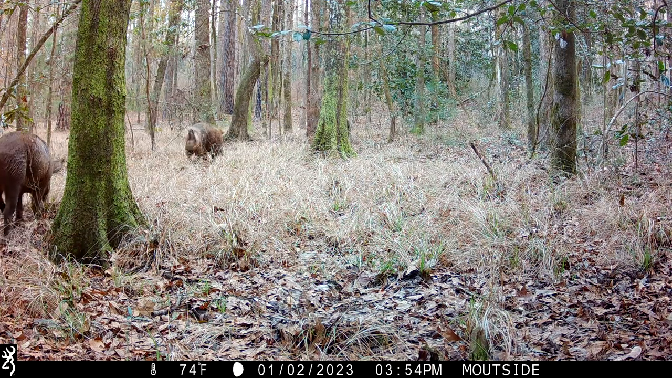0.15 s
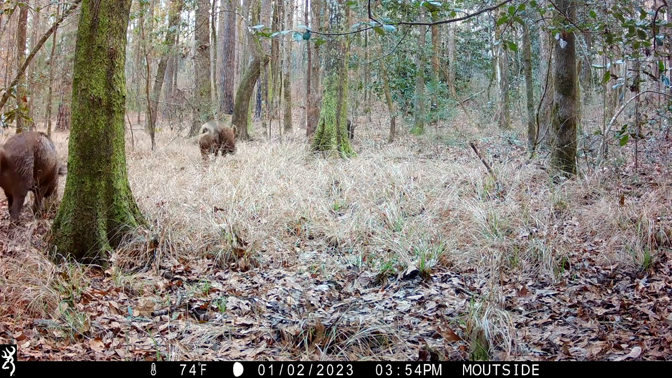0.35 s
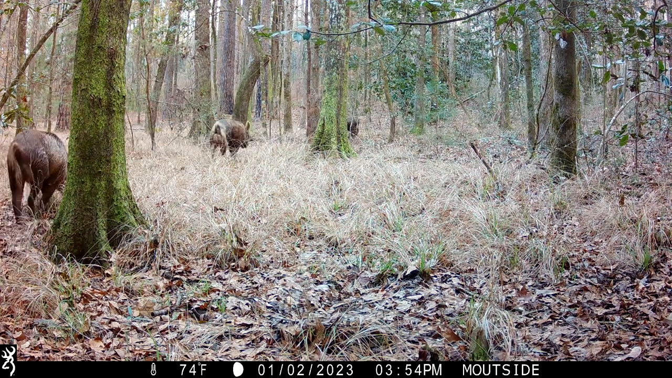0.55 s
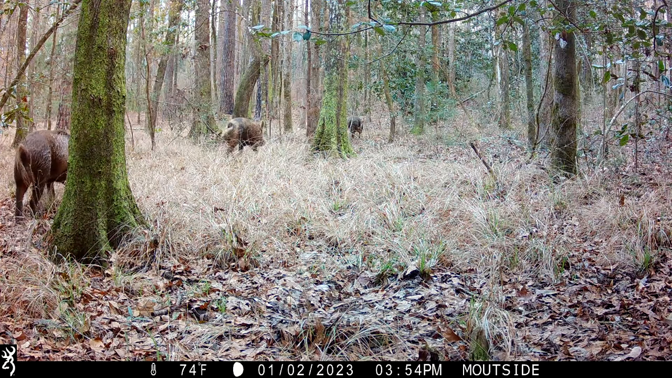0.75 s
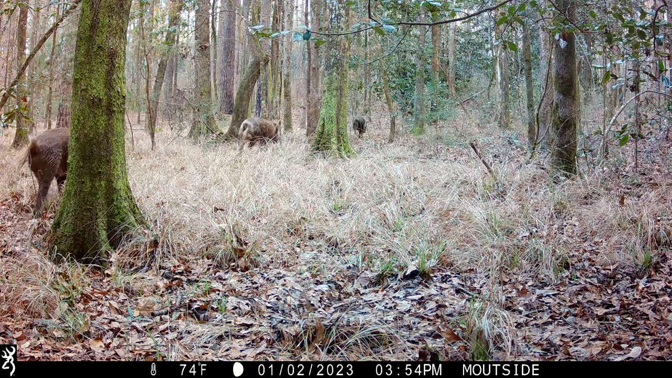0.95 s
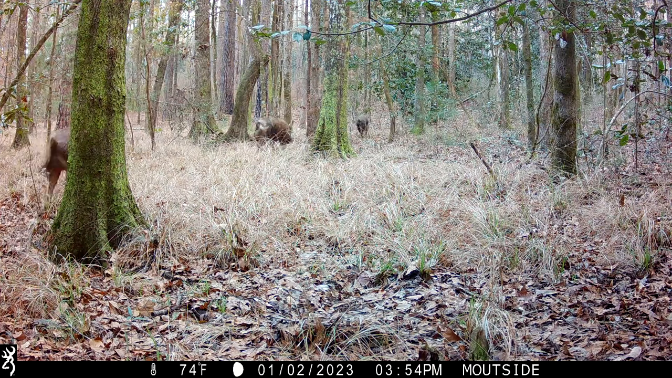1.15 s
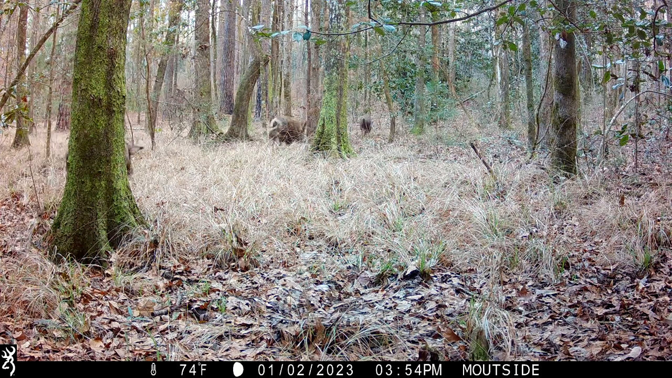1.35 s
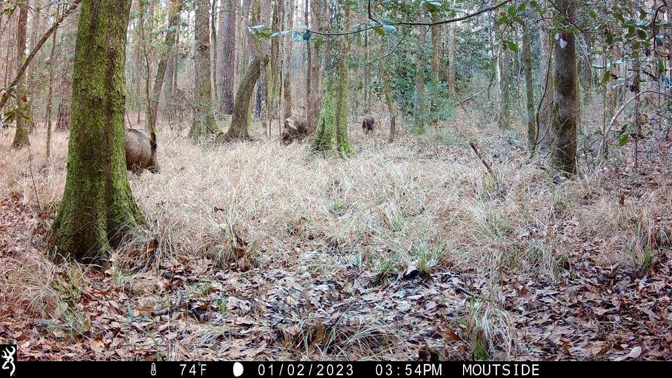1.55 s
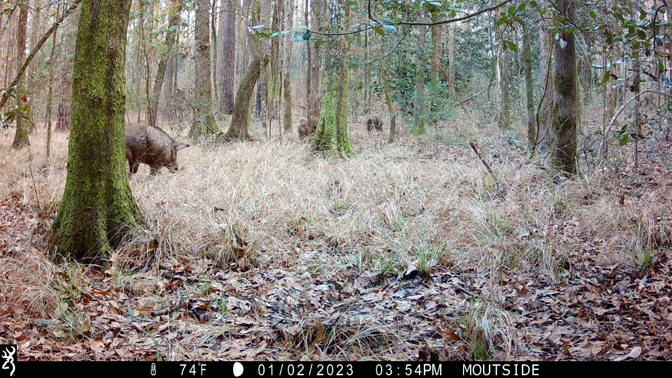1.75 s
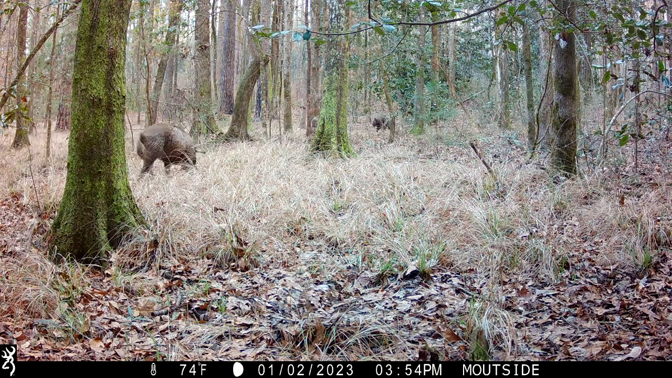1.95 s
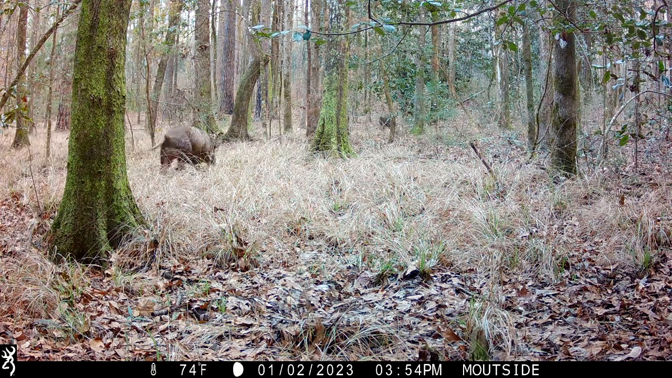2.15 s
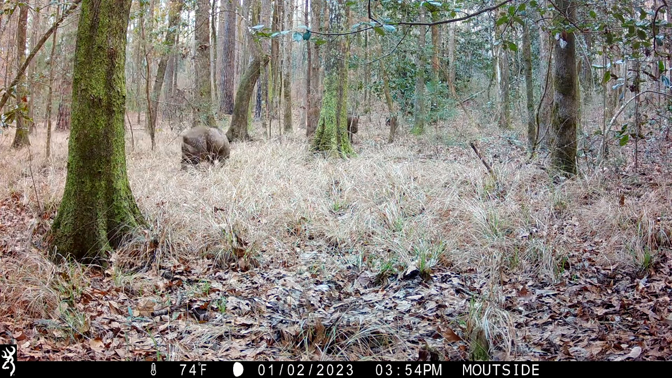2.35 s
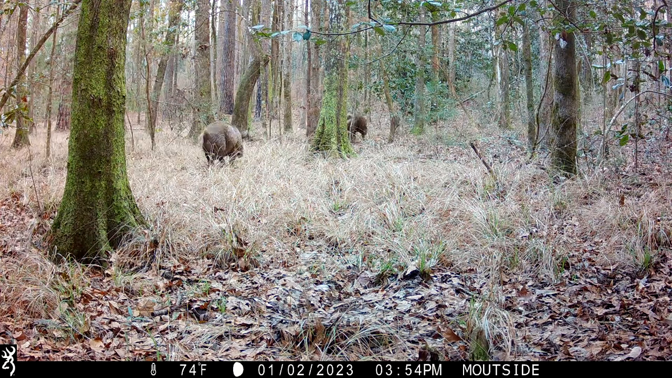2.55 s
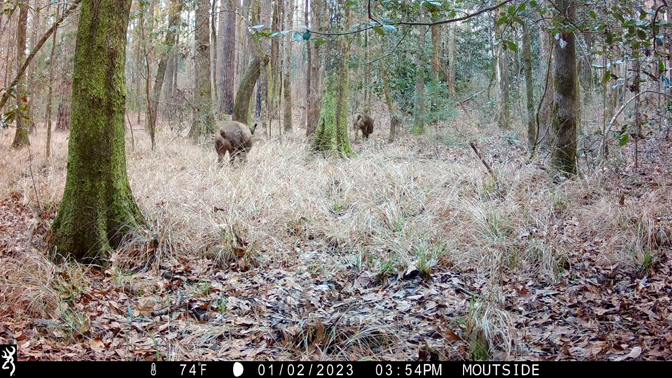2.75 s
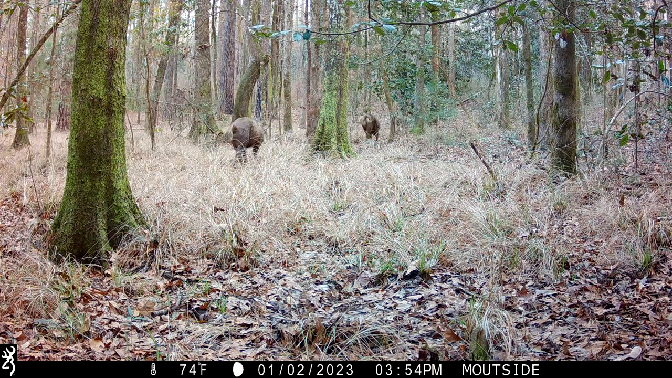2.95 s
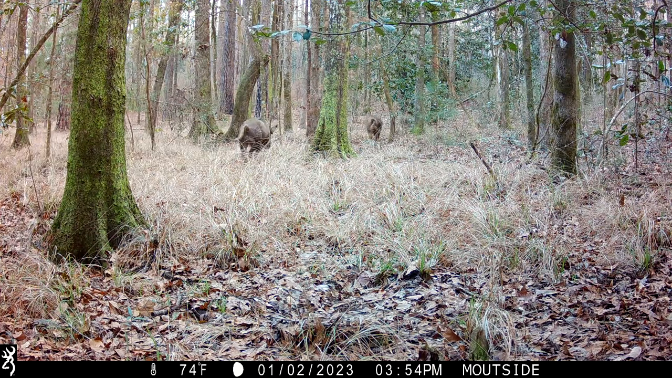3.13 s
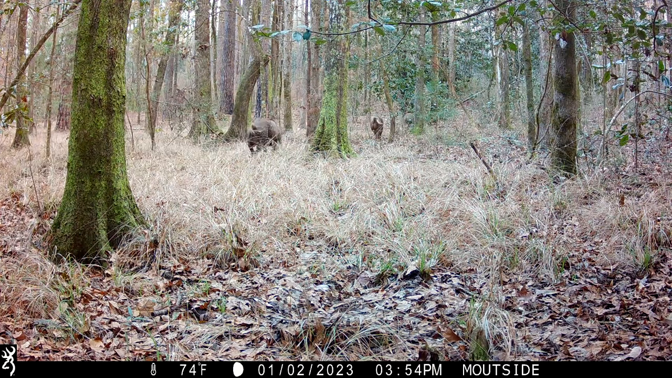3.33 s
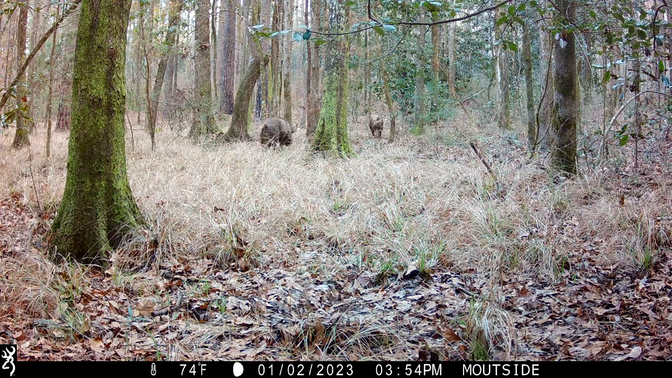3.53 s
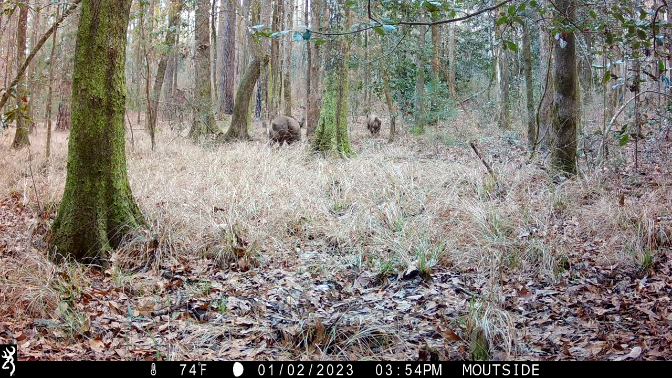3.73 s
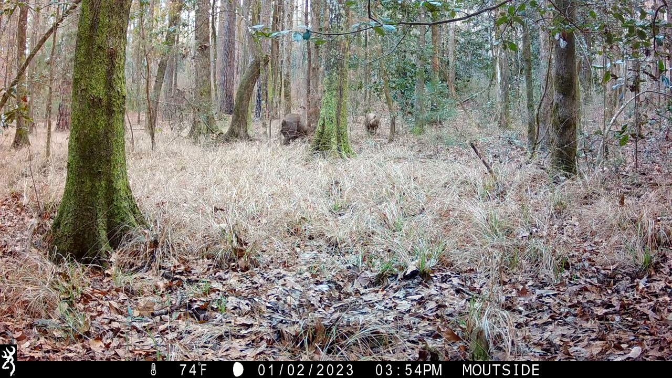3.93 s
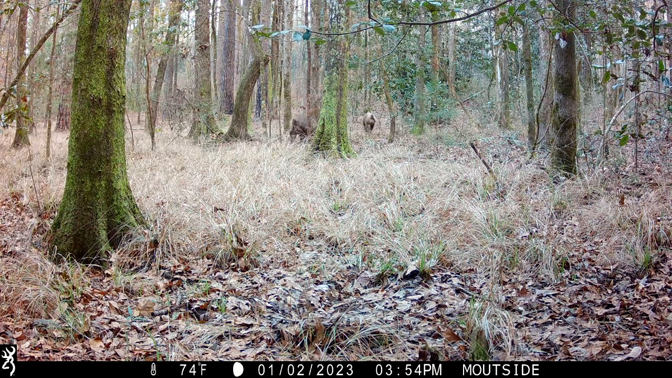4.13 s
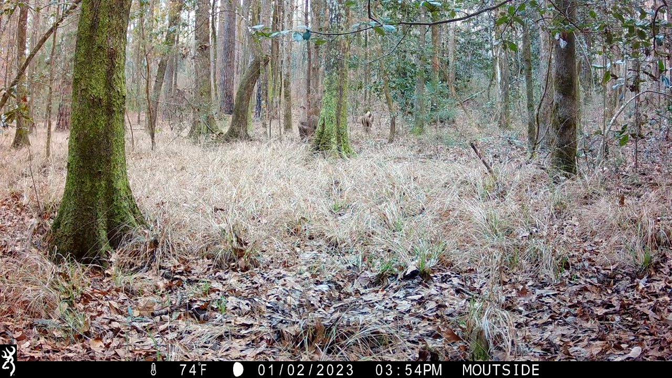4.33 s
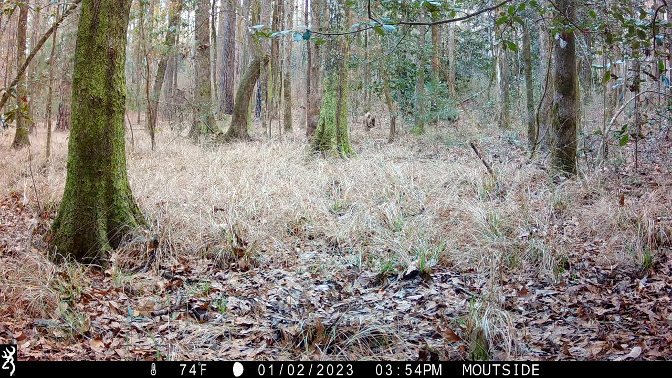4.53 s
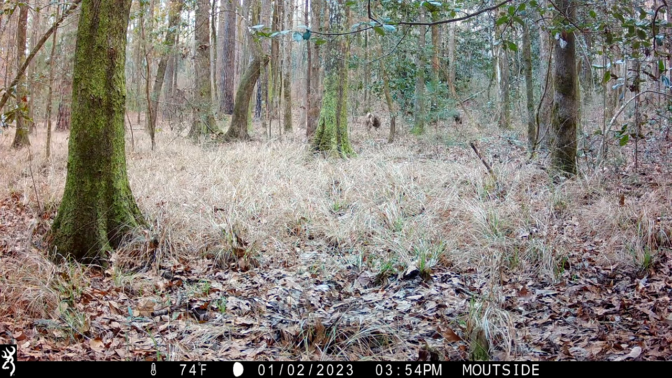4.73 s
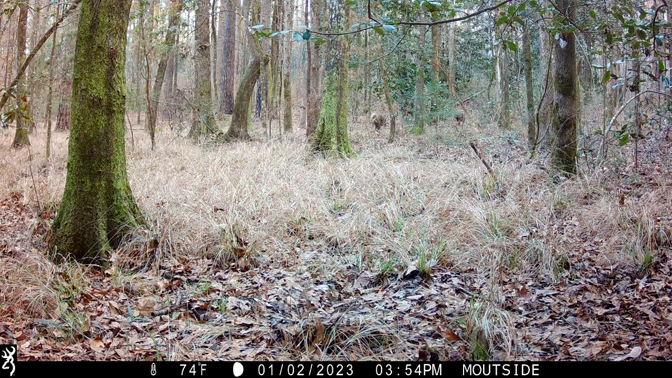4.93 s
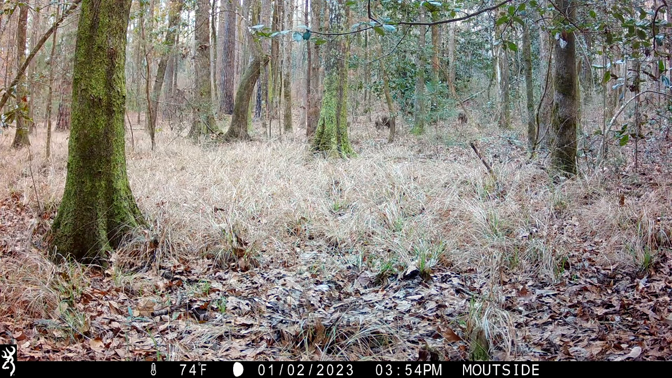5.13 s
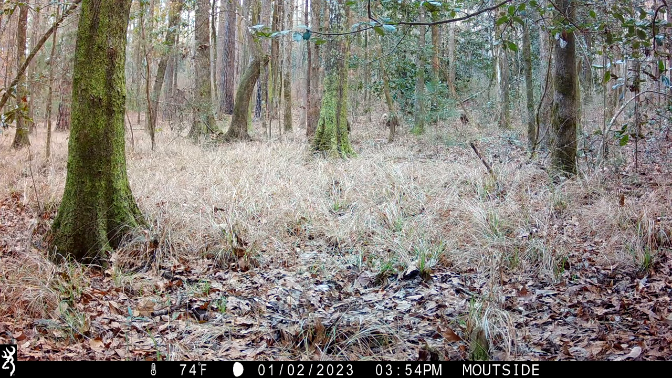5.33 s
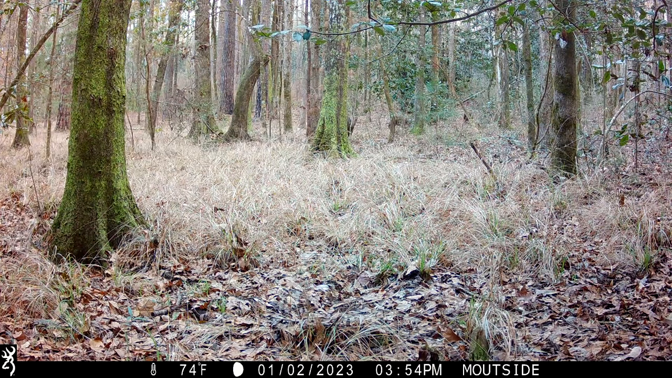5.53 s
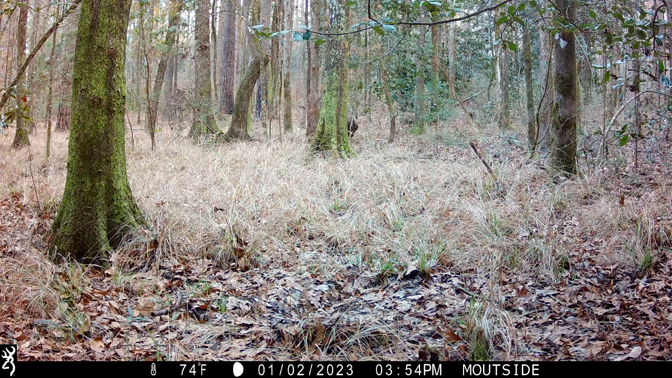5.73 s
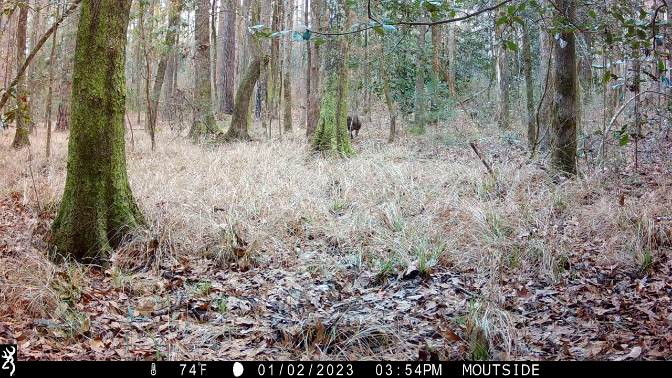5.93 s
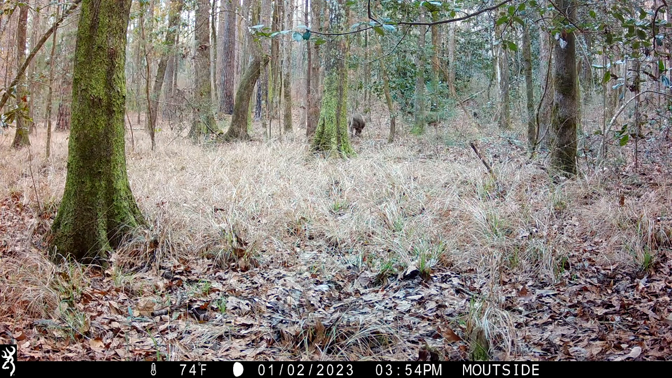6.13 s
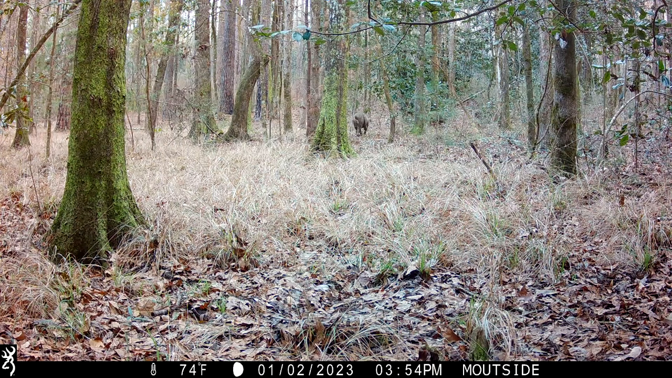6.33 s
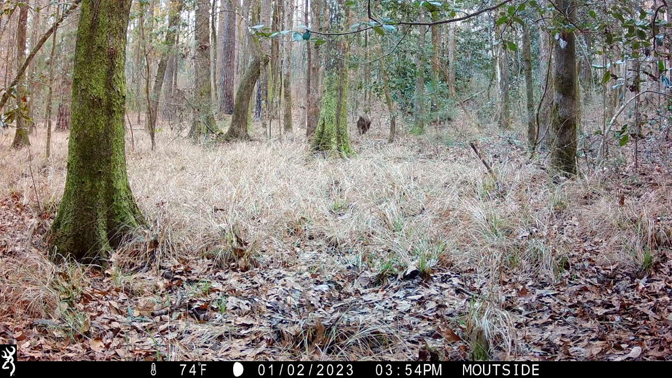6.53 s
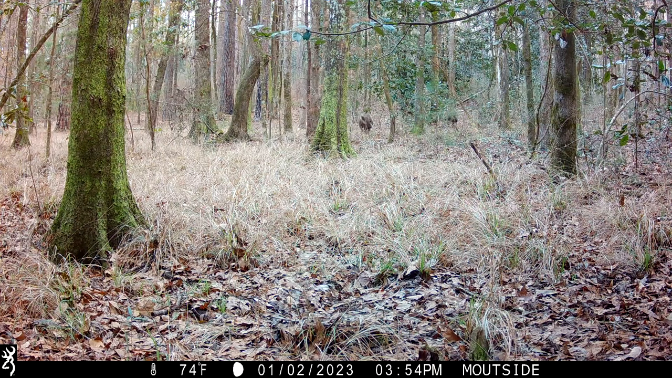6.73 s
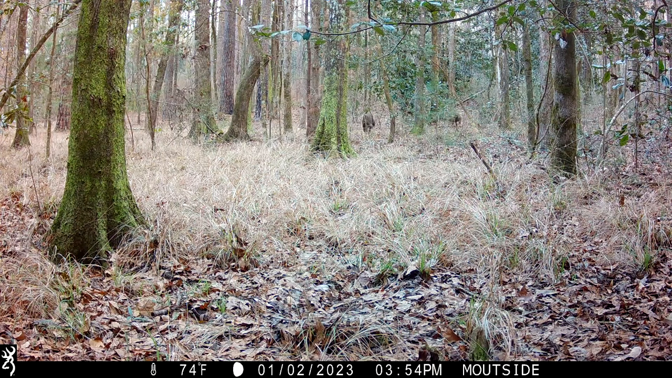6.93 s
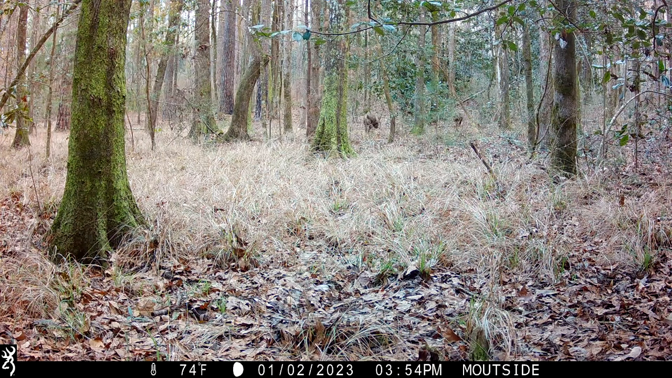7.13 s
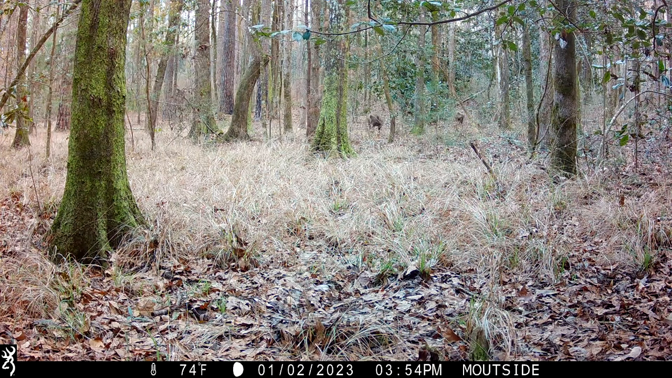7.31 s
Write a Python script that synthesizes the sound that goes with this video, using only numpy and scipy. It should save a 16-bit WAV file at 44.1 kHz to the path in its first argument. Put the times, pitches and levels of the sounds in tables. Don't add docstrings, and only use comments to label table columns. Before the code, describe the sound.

From the start, wild hogs trot through dry grass and leaf litter close to a fixed microphone in a small plastic case, which gives the crackle a boxy midrange ring. In the first second, rapid crunching strides mix with grassy swishes, sharp twig snaps, and dull hoof thuds on soft soil around 0.3 to 0.6 s; low soft grunts sound near 0.4 and 0.7 s. From 1 to 2 s the rustle is a little sparser, with a short grunt at 1.4 s, faint distant rumbles and another thud at 1.75 s. Between 2 and 3.1 s crackling thickens again, with the strongest snaps around 2.5 to 2.85 s. A weak grunt follows at 3.5 s. After 4 s the strides recede, softer and duller; faint grunts return from 4.8 to 5.4 s. By 6 to 7.4 s only thin rustling, a lone snap near 6.9 s and quiet forest air remain, with brief woodland echoes.

```python
import sys
import numpy as np
from scipy import signal
from scipy.fft import rfft, irfft
from scipy.io import wavfile
from scipy.ndimage import uniform_filter1d

SR = 44100
rng = np.random.default_rng(int(sys.argv[2]) if len(sys.argv) > 2 else 0)


def nominal_scale(level):
    x = np.asarray(level, float) / 20
    return 10 ** x


def bounce(signal):
    frames = np.transpose(np.atleast_2d(signal))
    limited = np.clip(frames, -1, 1)
    pcm = np.round(limited * 32767).astype(np.int16)
    wavfile.write(sys.argv[1], SR, pcm)


N = 329427
T = np.arange(N) / SR


def unit(x):
    return x / np.sqrt(np.mean(x ** 2))


def gain_at(table, size):
    hz, db = np.transpose(table)
    bins = np.fft.rfftfreq(size, 1 / SR) + 1
    return np.interp(np.log(bins), np.log(hz), db) * np.log(10) / 20


def band(x, hz, width):
    return signal.lfilter(*signal.iirpeak(hz, hz / width, SR), x)


def walk(rate):
    k = int(SR / rate)
    steps = np.repeat(rng.standard_normal(N // k + 1), k)
    smooth = uniform_filter1d(uniform_filter1d(steps, k), k)
    return unit(smooth[:N])


def cracks(rate, spread_db):
    most = N // 3
    where = rng.integers(0, N, most)
    size = rng.standard_normal(most)
    large = rng.exponential(size=most)
    used = np.arange(most) < rate * N / SR
    return unit(np.bincount(where, used * size * nominal_scale(spread_db * np.minimum(large, 5)), N))


# f/Hz, level/dB (per Hz)
CASE_COLOUR = [(120, -33.5), (200, -22.5), (454, -20), (544, -17), (992, -14.5), (1590, -2.5), (2020, 0),
               (2600, -3.5), (3960, -9.5), (6590, -29), (9480, -37.5), (13400, -39), (15500, -44)]


def through_case(x):
    cepstrum = irfft(gain_at(CASE_COLOUR, size=4096))
    cepstrum[1:2048] *= 2
    cepstrum[2049:] = 0
    response = irfft(np.exp(rfft(cepstrum)))
    return signal.fftconvolve(x, response)[:len(x)]


# f/Hz, level/dB (per Hz)
AIR_COLOUR = [(18, -43), (30, -27), (92, -12), (300, -13.5), (505, -3.5), (1080, -2), (2500, -5),
              (3900, -10), (7800, -32.5), (15500, -50)]


def air():
    hush = irfft(rfft(rng.standard_normal(N)) * np.exp(gain_at(AIR_COLOUR, size=N)), N)
    return unit(hush) * nominal_scale(-57.5 + .5 * walk(1.2))


def trunks(x, count=8):
    t60_s, level_db = 0.36, -12
    t = np.arange(SR // 2) / SR
    fade = np.exp(-np.log(1000) * t / t60_s) * (1 - np.exp(-t / 0.0015))
    place = np.repeat(rng.integers(0, count, N // 1024 + 1), 1024)[:N]
    out = 0
    for k in range(count):
        tail = signal.lfilter([1], [1, -.4], rng.standard_normal(len(t)) * fade)
        tail = tail / np.sqrt(np.sum(tail ** 2))
        share = np.sqrt(np.abs(uniform_filter1d(1. * (place == k), size=256)))
        out = out + signal.fftconvolve(x * share, tail)[:N]
    return nominal_scale(level_db) * out


def voice(pushes, partials_db, waver):
    rise_s, fall_s = 0.021, 0.0403
    lift_share, scoop_share, scoop_s, sag_per_s = 0.105, 0.081, .04, .25
    size = np.zeros(N)
    hz = np.full(N, 1. * pushes[0][4])
    for s, long, push_db, held_db, rate in pushes:
        t = np.maximum(T - s, 0)
        push = np.where(t < rise_s, t / rise_s, np.exp(-(t - rise_s) / fall_s))
        fade = np.clip(np.minimum(t, long - t + 0.022) / 0.0096, 0, 1)
        held = nominal_scale(held_db)
        size = np.maximum(size, fade * (held + (nominal_scale(push_db) - held) * push))
        lift = lift_share * push * np.clip((push_db - held_db) / 10, 0, 1)
        scoop = scoop_share * np.exp(-t / scoop_s)
        sag = sag_per_s * np.minimum(t, .3)
        hz = np.where(T >= s, rate * (1 + lift - scoop - sag), hz)
    effort_db = .3 * np.maximum(20 * np.log10(size + 1e-9) + 87, 0)
    phase = 2 * np.pi * np.cumsum(uniform_filter1d(hz, size=1500) * waver) / SR
    tone = 0
    for k, db in enumerate(partials_db):
        tone = tone + nominal_scale(db + k * effort_db - effort_db) * np.sin((k + 1) * phase)
    return np.sqrt(2) * size * tone


# t/s, length/s, push level/dB, held level/dB, pulse rate f/Hz
NEAR_GRUNTS = [(.4, .04, -73, -70, 59), (.44, 0.22, -57, -70, 66), (.675, 0.24, -57, -73.5, 71.05),
               (1.41, 0.13, -64.5, -84, 57.4), (3.39, .11, -71, -77, 55.3), (3.51, .15, -67, -75, 64),
               (4.76, .05, -76, -80, 56.2), (4.81, 0.12, -70.5, -74, 62), (4.945, .12, -60.5, -78, 72.4),
               (5.09, .19, -74, -73.5, 76.3), (5.3, 0.18, -73, -71.5, 71.7)]
# t/s, length/s, push level/dB, held level/dB, pulse rate f/Hz
FAR_RUMBLES = [
    (1.02, 0.2, -77, -78.5, 57),
    (1.82, .2, -84, -88, 55),
    (2.12, .45, -79.5, -87.5, 54),
    (2.95, .4, -86, -82, 56),
]
NEAR_PARTIALS = (-5.5, -1.5, -16)
FAR_PARTIALS = (-19, -11, 2)


def grunts():
    waver = 1 + 0.024 * walk(41)
    uneven = nominal_scale(1.8 * walk(30))
    near = voice(NEAR_GRUNTS, NEAR_PARTIALS, waver)
    far = voice(FAR_RUMBLES, FAR_PARTIALS, waver)
    return uneven * (near + far)


# t/s, peak level/dB, f/Hz
HOOF_THUDS = [(0.29, -54.5, 208), (0.453, -44, 427), (.515, -48, 516), (.589, -44, 500), (0.928, -60, 253),
              (1.7493, -45, 470), (1.514, -59, 270), (2.022, -66, 207), (2.473, -61.5, 256),
              (3.32, -64, 240), (3.528, -59.5, 169), (3.848, -65, 221), (4.099, -66, 328),
              (4.279, -67, 164)]


def thuds():
    cycles, firm_hz = 1.6, 196
    out = np.zeros(N)
    for s, db, hz in HOOF_THUDS:
        t = np.maximum(T - s, 0)
        soft = cycles / hz * min(firm_hz / hz, 1)
        out += nominal_scale(db + 7) * t / soft * np.exp(-t / soft) * np.sin(2 * np.pi * hz * t)
    return out


# t/s, bright peak level/dB
GRASS_HITS = [(.0238, -59), (0.041, -45.5), (.1067, -43), (0.1787, -35.5), (.3401, -51), (.4509, -41),
              (.5736, -54), (.5891, -52), (.9552, -48), (1.035, -53.5), (1.263, -51), (1.6646, -60),
              (2.0216, -41.5), (2.405, -43), (2.4309, -50), (2.484, -41), (2.6958, -46), (2.7152, -61),
              (2.7761, -43.5), (2.7965, -54), (2.836, -54), (2.9342, -52.5), (2.9547, -45.5), (3.0245, -54),
              (3.057, -54), (3.4491, -54), (3.489, -53), (3.9285, -51), (3.9694, -49.5), (4.7132, -61)]


def swishes():
    blow = np.zeros(N)
    for s, db in GRASS_HITS:
        blow[int(s * SR)] = nominal_scale(db)

    def fade(ms):
        return signal.lfilter([1], [1, -np.exp(-1000 / SR / ms)], blow)

    bright = signal.butter(3, 5500, "high", fs=SR, output="sos")
    fizz = signal.sosfilt(bright, rng.standard_normal(N))
    fizz = unit(signal.lfilter([1], [1, -.6], fizz))
    leaves = unit(through_case(cracks(rate=5000, spread_db=7.0)))
    crunch = nominal_scale(5) * (fade(ms=20) - fade(ms=1.2)) * leaves
    return nominal_scale(-13.5) * (fade(ms=1.1) + 0.5 * fade(ms=20)) * fizz + crunch


# t/s, peak level/dB, f/Hz, length/ms
TWIGS = [(.1104, -22, 1800, 2.6), (.158, -19.5, 1740, 2.5), (.1795, -17.5, 2540, 2.6),
         (.3034, -24.5, 1750, 3.6), (.3493, -24, 2090, 1.5), (.4148, -23.5, 2300, 4.5),
         (.4659, -22, 2630, 1.5), (.5907, -20, 1940, 2.1), (.7045, -26, 2010, 2.3), (.8592, -24, 2320, 5.2),
         (.895, -22, 4030, 3.1), (.9483, -28, 2330, 1.6), (1.3687, -29.5, 1990, 7.8),
         (1.7495, -22.5, 1870, 1.5), (2.0264, -25.5, 1790, 6), (2.0359, -25, 1890, 2.6),
         (2.085, -24.5, 2150, 6.9), (2.3562, -20.5, 2128, 1.7), (2.4701, -22, 1800, 1.9),
         (2.4924, -16, 3200, 5.3), (2.5864, -20, 1440, 1.5), (2.6528, -24.5, 2110, 4.2),
         (2.6972, -16.5, 2520, 2.6), (2.7778, -23, 1950, 3.9), (2.838, -17.5, 1815, 1.7),
         (2.8458, -17, 1780, 1.3), (2.9892, -20, 1760, 2.5), (3.4562, -29, 1870, 3.2),
         (5.4229, -27.5, 2443, 1.4), (6.868, -27, 2630, 2.2)]
# t/s, peak level/dB, f/Hz
STIFF_LEAVES = [(0.1176, -31, 2480), (.3239, -39, 1680), (0.3434, -27, 1660), (.3537, -28, 2430),
                (0.5493, -33, 2090), (.5931, -25, 2120), (.944, -27, 2130), (0.9548, -27, 1920),
                (1.396, -24, 2200), (1.984, -24.5, 2112), (2.0435, -31, 1940), (2.407, -25, 2100),
                (2.4303, -25, 2520), (2.5209, -36, 2100), (2.69, -28, 3530), (2.721, -27, 1820),
                (2.8318, -29, 2130), (2.882, -27, 2070), (2.9588, -26, 2710), (3.032, -29.5, 1640),
                (3.081, -29, 1520), (3.2157, -34, 1980), (3.463, -37, 1760), (4.455, -28, 2000),
                (5.345, -39, 2300), (5.648, -29.5, 1800), (5.805, -33, 2000)]


def snaps():
    leaf_ms, knock_db = 2.5, -39
    size = 2048
    out = np.zeros(N + size)
    ms = np.arange(size) / SR * 1000
    rows = TWIGS + [(*leaf, leaf_ms) for leaf in STIFF_LEAVES]
    for s, db, hz, long_ms in rows:
        chance = rng.standard_normal((2, size))
        splinter = (np.abs(chance[0]) > 1.9) * chance[1] * 1.5
        splinter = splinter * (ms < long_ms - .9) * np.exp(-.5 * ms / long_ms)
        splinter[0] = 1
        splinter = signal.lfilter([1], [1, -.55], splinter)
        sharp = 1.7 * signal.lfilter([1, -1], [1, -.9], splinter)
        body = through_case(sharp + 3 * band(splinter, hz, hz / 3))
        knock = band(band(splinter, 376, 370), 376, 370)
        snap = body / np.abs(body).max() + nominal_scale(knock_db) * knock / np.abs(knock).max()
        i = int(s * SR) - 20
        out[i:i + size] += nominal_scale(db - 2.5) * snap
    return out[:N]


# t/s, drag/s, rustle level/dB, crispness
# level/dB
STEPS = [(-.02, 0.079, -40.5, -0.5), (.045, 0.12, -38, -2.5), (.295, .03, -39.5, -2),
         (.33, .16, -39, -0.5), (.51, 0.019, -52, 0), (.64, 0.037, -40.5, -4), (.79, 0.019, -44, 2),
         (.855, .06, -45.5, 10), (0.941, 0.04, -38, -1.5), (1.02, 0.17, -44, -0.5),
         (1.25, 0.19, -46.5, 7), (1.46, 0.1, -41, 1), (1.747, 0.053, -39.5, 1.5),
         (1.83, 0.091, -40, -2), (2.02, 0.071, -41, 4.5), (2.24, 0.23, -41, 0), (2.34, 0.085, -48, -6),
         (2.465, 0.046, -34, -2.5), (2.53, .12, -40, 3), (2.68, 0.023, -48, 6),
         (2.775, 0.069, -40, 3.5), (2.9, 0.074, -39, 1), (3.04, 0.075, -42.5, 2.5),
         (3.188, 0.15, -40, 2), (3.44, 0.11, -37, 1), (3.68, 0.14, -40.5, 1.5),
         (3.928, 0.13, -45, 6.5),
         (4.16, 0.21, -44.5, 1.7), (4.37, 0.18, -46.5, -0.62), (4.685, 0.13, -45.5, -0.73),
             (4.929, 0.16, -43.5, -3.6), (5.235, 0.066, -46.5, -0.3), (5.33, 0.089, -46, 0.59),
             (5.42, .24, -44, -0.6), (5.7, 0.21, -47.5, -0.89), (5.96, 0.11, -51.5, -0.25),
             (6.16, 0.063, -59, -0.083), (6.26, .19, -52, 0.33), (6.46, 0.085, -50, -0.5),
             (6.65, 0.097, -50.5, 0.34), (6.73, 0.34, -48.5, 0), (7.13, 0.19, -52.5, 0.49),
             (7.39, 0.15, -49.5, 4.4)]


def strides():
    attack_s, rise_share = 0.0035, 0.08
    sag_db_s, release_db_s = 9.5, 148
    herd_db = -42 - 1.48 * T
    power = nominal_scale(2 * herd_db)
    crisp = 2 * power
    for s, drag, db, crisp_db in STEPS:
        t = np.maximum(T - s, 0)
        rise = np.minimum(t / (attack_s + rise_share * drag), 1)
        fall_db = sag_db_s * t + release_db_s * np.maximum(t - drag, 0)
        swell = (rise * nominal_scale(db - fall_db)) ** 2
        power = power + swell
        crisp = crisp + crisp_db * swell
    body_db = 10 * np.log10(power)
    damp_db = 1 - 0.35 * (body_db - herd_db)
    return body_db, crisp / power, damp_db


def rustle():
    far_thin_db_s, air_loss_db_s = 0.29, 0.57
    body_db, crisp_db, damp_db = strides()
    drag = nominal_scale(1.07 * walk(60))
    sheet = cracks(rate=6000, spread_db=0.5)
    out = 0
    for hz in 200 * 2 ** np.arange(0, 6.4, 1 / 3):
        own = cracks(rate=.6 * hz, spread_db=2.0)
        leaf = band(own + 0.52 * sheet, hz, hz / 3)
        crisp, damp = np.clip(np.log2([hz / 3500, 1500 / hz]), 0, 1)
        tilt_db = crisp * (crisp_db + 1.4) + damp * damp_db
        tilt_db = tilt_db + far_thin_db_s * T * np.clip(np.log2(hz / 2000), -.5, 1.4)
        tilt_db = tilt_db - air_loss_db_s * T * max(np.log2(hz / 5500), 0)
        out = out + leaf * nominal_scale(tilt_db + 1.9 * walk(25))
    out = through_case(out) * drag
    ringing = signal.butter(3, (1200, 4500), "band", fs=SR, output="sos")
    core = signal.sosfilt(ringing, out)
    return out / core.std() * nominal_scale(body_db - 1.23)


def scene():
    near = nominal_scale(-0.83) * rustle() + snaps() + swishes()
    bass_cut = signal.butter(2, 164, "high", fs=SR, output="sos")
    near = signal.sosfilt(bass_cut, near)
    return (near + trunks(near) + grunts() + thuds() + air())[None]


def top_cut(x):
    return signal.sosfilt(signal.butter(12, 15780, fs=SR, output="sos"), x)


def record(dry):
    top = signal.ellip(10, .2, 60, 15750, fs=SR, output="sos")
    mix = signal.sosfilt(top, dry)
    return top_cut(mix)


dry = scene()
out = record(dry)
bounce(out)
```